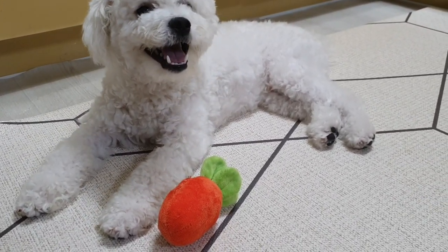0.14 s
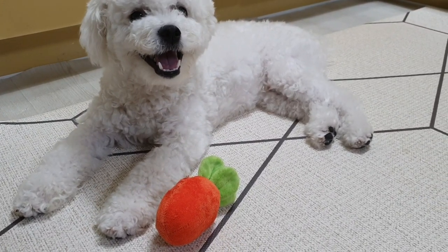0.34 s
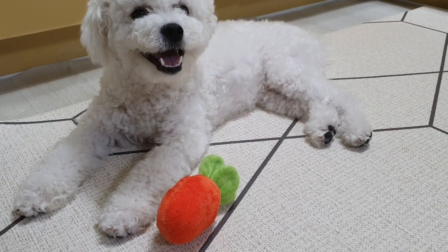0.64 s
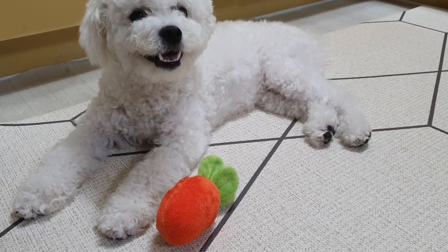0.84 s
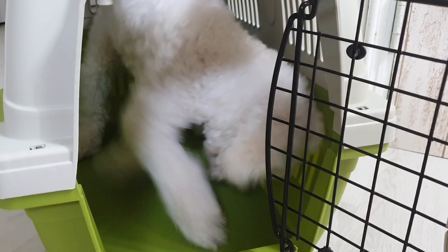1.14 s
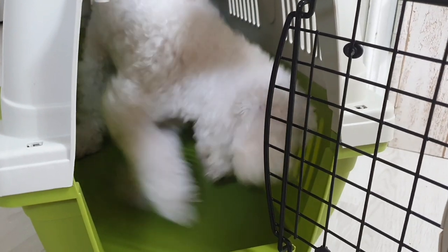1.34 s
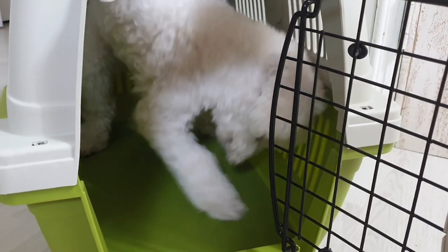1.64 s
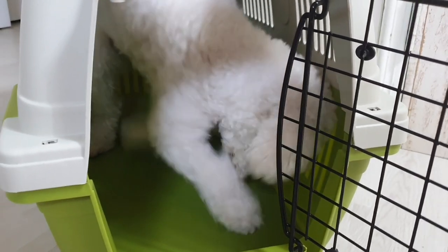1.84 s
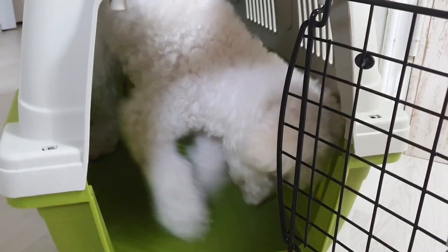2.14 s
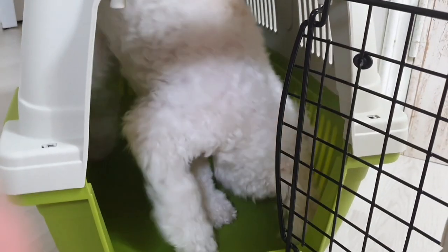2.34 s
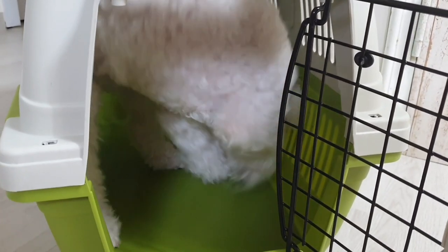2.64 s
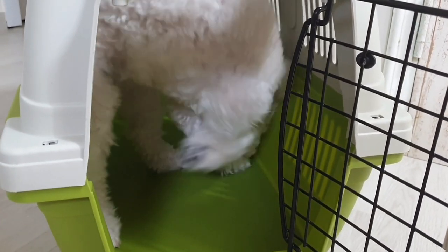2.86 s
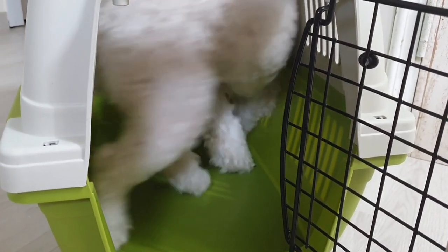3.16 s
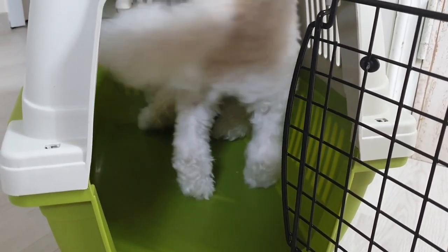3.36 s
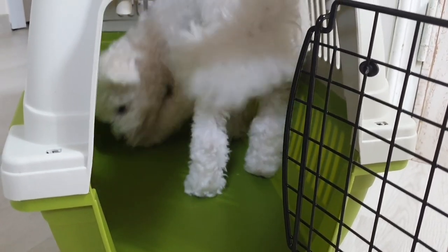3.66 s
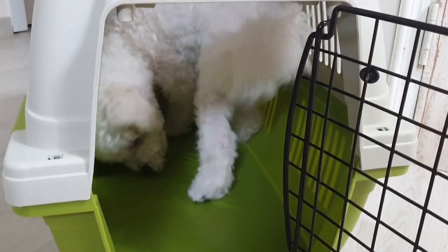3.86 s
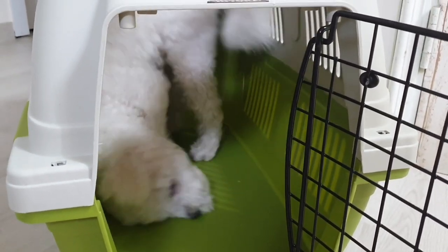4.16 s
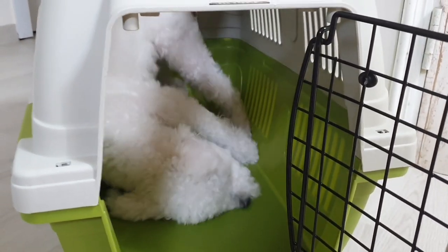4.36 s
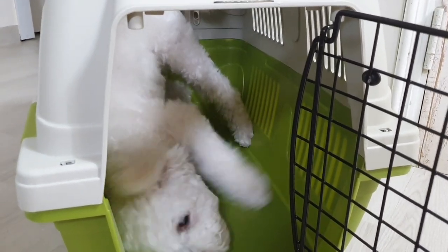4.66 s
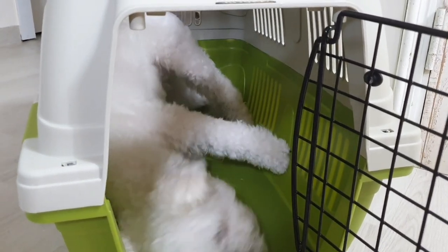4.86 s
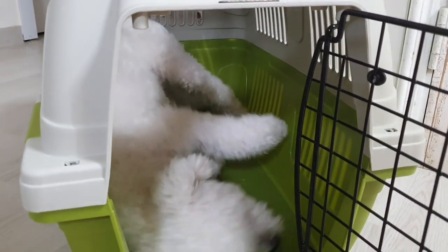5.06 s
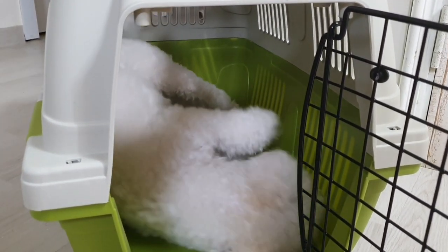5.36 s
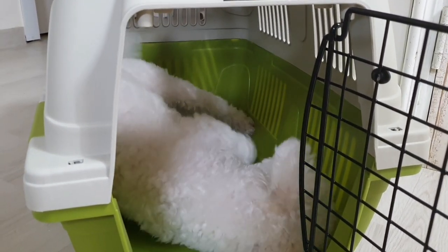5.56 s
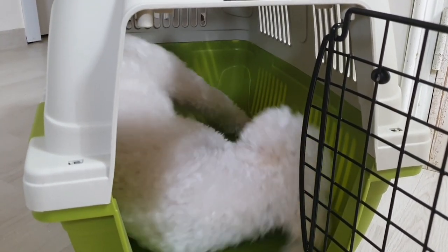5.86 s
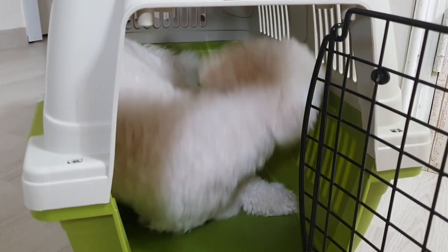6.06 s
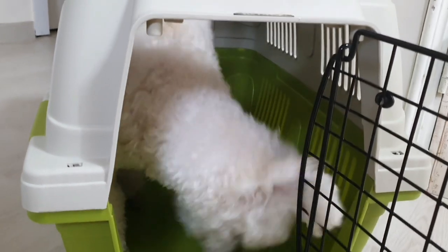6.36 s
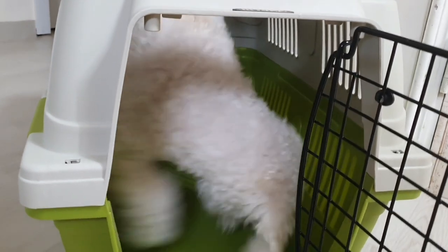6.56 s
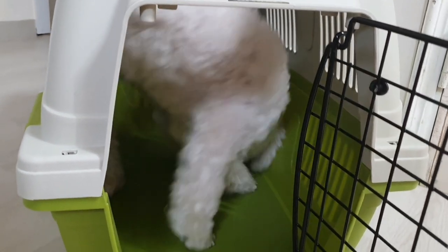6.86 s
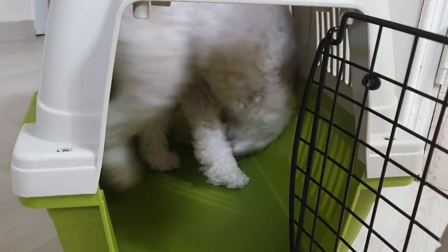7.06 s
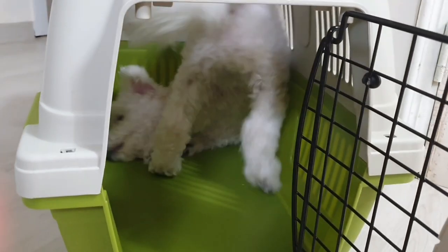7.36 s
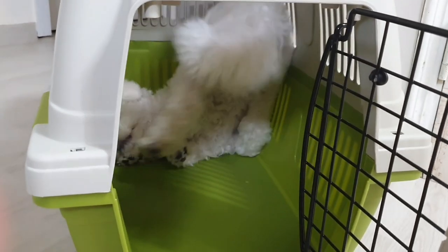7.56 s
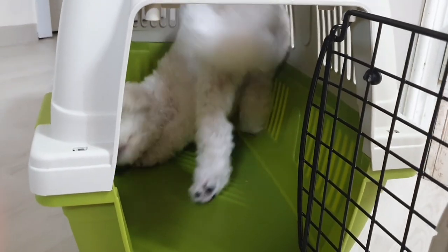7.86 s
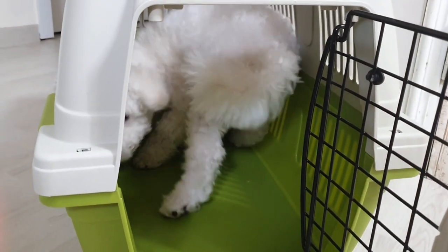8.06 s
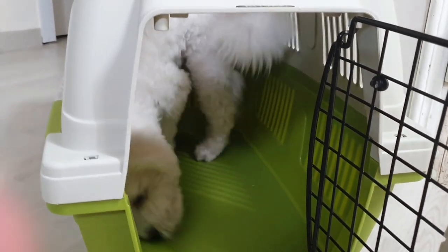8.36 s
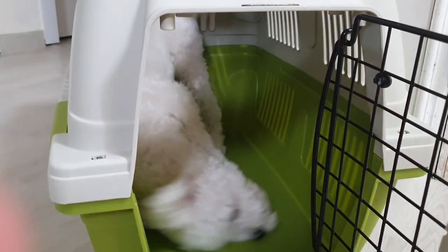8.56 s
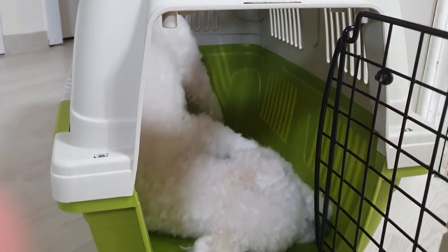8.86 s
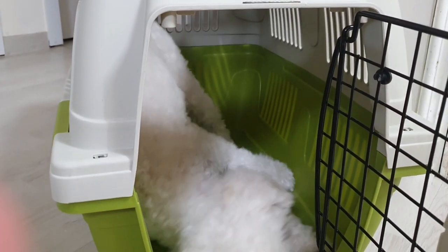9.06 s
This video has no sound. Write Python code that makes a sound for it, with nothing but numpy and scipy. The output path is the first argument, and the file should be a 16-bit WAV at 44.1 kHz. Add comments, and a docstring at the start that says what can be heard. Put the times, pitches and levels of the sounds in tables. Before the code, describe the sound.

For the first 0.9 seconds there is only faint, low room rumble, which fades quickly into a very short silence. At about 1.03 s the sound cuts in abruptly: a small dog digs in a plastic carrier, claws scraping and ticking on the hard floor pan while paws strike hollow, boxy low thumps at a steady nine or so per second until about 2.3 s. Strong, dry scratches continue to about 3 s, more irregular. From 3 to 4 s come sparser skids and soft rubs. Around 4.2-4.4 s a tumble gives a cluster of knocks, then quieter ticks and fur slides, with a near lull at 5.5-5.9 s. A rub at 6 s leads to heavier bumps and scratches near 6.7 s, then light clicks, scuffs and thuds to 9.2 s. Close stereo pickup, short room reverberation, quiet rumble beneath.

```python
"""A small dog digs, turns and rolls in a plastic carrier in a quiet room: claws tick and skid on the floor pan,
paws and body thump it, fur and pads rub along it. Ticks, blows and clumped friction slips set the shell's
modes ringing at three spots, which reach two microphone ports with a wall echo and a short room tail.
A moment of bare room rumble, shaped from noise, comes first and fades out; after a short silence the dog
and the rumble come in abruptly."""
import sys
import numpy as np
from scipy import signal
from scipy.fft import rfft, irfft, next_fast_len
from scipy.io import wavfile

SR = 44100
rng = np.random.default_rng(int(sys.argv[2]) if len(sys.argv) > 2 else 0)


def materialize(psi):
    """Save the field psi as 16-bit PCM at rate SR to the path in sys.argv[1].

    A 1-D psi becomes a single channel; in a 2-D psi each row is a channel.
    """
    bounded = np.clip(np.atleast_2d(psi).T, -1, 1)
    quanta = np.round(bounded * 32767).astype(np.int16)
    wavfile.write(sys.argv[1], SR, quanta)


N = 406161

# claw contacts on the pan, levels relative: [t/s, skid level/dB, treble modes/dB, low modes/dB,
# skid decay/ms, first tick against the skid/dB]
CLAW_CONTACTS = [(1.094, -31, -12, 7, 6.1, 0), (1.104, -17.5, -5, -12, 1.6, 12.5),
                 (1.1139, -16.5, -8, -14, 7.3, 0), (1.1448, -19, -8.5, -30, 5.2, 16),
                 (1.216, -18.5, -3, -10, 2.7, 10), (1.2298, -16, -7, -17, 5, 8),
                 (1.3342, -14, -1.5, -38, 3.6, 9.5), (1.3649, -18.5, -11, -19, 5.4, 7),
                 (1.4417, -15, -7, -35, 2.2, 4), (1.5657, -11.5, -6, -17, 3.4, 5),
                 (1.697, -12.5, -4, -27, 4.2, -18), (1.711, -17, -31, -16, 2.3, 7),
                 (1.7938, -6, -6.5, -15.5, 2.7, 9), (1.8984, -6, -10, -16.5, 1.1, 4),
                 (2.0275, -11, -5.5, -15, 2.5, -5), (2.137, -11.5, -6, -16, 8.5, 14.5),
                 (2.2649, -14, -4, -11, 1.26, 13.5), (2.3907, -11.5, -10.5, -17, 1.6, -1),
                 (2.4064, -26.5, -3, -14, 1.2, 22), (2.551, -8, -10, -27, 1.4, 17),
                 (2.6289, -17.5, -10.5, -16, 6.9, 9), (2.6508, -24, -6, -8, 4.5, 15),
                 (2.7637, -11.5, -6.5, -23, 3.1, 9), (2.8788, -4, -13.5, -46, 2.4, -4),
                 (2.8905, -18.5, -1.5, -5, 2.5, 15.5), (3.025, -22, -9.5, -13, 3.8, -3),
                 (3.242, -12, -8, -12.5, 1.2, -1), (3.407, -16.5, -12, -17, 2.5, -8),
                 (3.483, -25.5, -5, -27, 4.1, 6), (3.501, -20.5, -16, -18, 5.5, -4),
                 (3.728, -16, -11.5, -38, 2.2, 16.5), (3.741, -29.5, 2.5, -14, 2.2, 1),
                 (3.8717, -27.5, -19, -30, 2.3, 2), (3.926, -46, -6, 9.5, 2.2, 12),
                 (3.9876, -33, -11, -3, 11, -4), (4.007, -15.5, -13.5, -16.5, 1.9, 17),
                 (4.171, -51.5, -18, 20.5, 16, 0), (4.2233, -28.5, -32, -3, 4.2, 5),
                 (4.2567, -42, -31, 17, 3.5, -5), (4.31, -38, -6, -15, 2.1, 8),
                 (4.3304, -26.5, -7, 0, 5.3, -3), (4.34, -21, -14, -4.5, 3.4, -8),
                 (4.372, -24, -12, -23, 8, 3), (4.435, -24, -2, -22, 3.9, -2),
                 (4.4416, -15, -9.5, -12, 2.2, 6), (4.623, -31.5, -6, -14, 4.4, 7),
                 (4.734, -32, -7, -9.5, 5, 22), (4.786, -19, -1, -25, 2, 9),
                 (4.7933, -20.5, -2.5, -9, 1.4, 15.5), (4.9708, -41.5, 1, 8.5, 3.8, 12),
                 (5.1181, -20, -1, -5.5, 5.1, 10), (5.2592, -16, -7, -14, 2.5, -3),
                 (5.271, -21.5, -4, -14, 1.5, 7), (5.5384, -46.5, -5, -18, 8.6, 14),
                 (5.557, -46, -6, -20, 1.8, 10), (5.5774, -56, -7, -15, 2.2, 19),
                 (5.872, -33, -16, -12, 1.7, 9), (6.19, -36.5, -30, -4, 11, 11),
                 (6.2449, -34.5, -8, -22, 2.6, 15), (6.3358, -32.5, -22, 4.5, 13.4, 3),
                 (6.3616, -19, -6, -14.5, 6.8, 7), (6.504, -29.5, -5, -25, 5.8, 20),
                 (6.5165, -33, -8.5, -37, 5.5, 24), (6.603, -33, -1.5, 2.5, 4.9, 5),
                 (6.6536, -11.5, -9, -9, 2.7, 1), (6.6987, -12, -7, -10, 1.8, 10.5),
                 (6.8052, -26.5, -31, -4, 6, 0), (6.914, -22.5, -2, -9.5, 5.4, 4),
                 (7.005, -44, -5.5, -4.5, .8, 30), (7.175, -54, -14, -18, .8, 26),
                 (7.198, -54, -10, -10, .8, 27), (7.207, -48, -16, -8, .8, 30),
                 (7.2535, -45, -8, -3, .8, 31.5), (7.276, -45, -3, -7, 1.2, 24),
                 (7.2808, -14.5, -6.5, -19, 2.6, 12), (7.3051, -24.5, -9.5, -2.5, 3.9, 21.5),
                 (7.4216, -19.5, -8.5, -5, 1.1, 13.5), (7.5429, -29, -14, -37, 2.8, 6),
                 (7.6306, -54.5, -54, 18, 7.1, 12), (7.658, -35.5, -16, -50, 7, 11),
                 (7.787, -31.5, -18, 0, 3.2, 7), (7.7923, -24, -4.5, -2, 2.5, -1),
                 (7.9054, -35, -21, 4, 5.4, 5), (7.933, -34, -10, -17, 2, 16),
                 (7.9804, -28.5, -15, -6, 13, 4), (8.035, -30, -10, -34, 5.2, 11),
                 (8.228, -43.5, -11, -20, 2.8, 12), (8.2881, -39, -7, 1, 1.2, 15),
                 (8.33, -14.5, -10, -23, 1.3, 3), (8.489, -30.5, -9, -35, 3.1, 16.5),
                 (8.5936, -38, -28, 3, 13, 11), (8.6232, -34, -17, -9, 31, 16),
                 (8.667, -15.5, -20, -22, 10.5, -4), (8.7141, -25, -14, -6, 2.3, 2),
                 (8.814, -27, -14.5, -4.5, 3.8, -2), (8.8706, -27, -10, -34, 7.4, 1),
                 (8.8898, -23, -27, -14, 3.7, 10), (8.9417, -22, -17, -42, 21, 14),
                 (8.975, -29, -21, -20, 5.2, 0), (9.0201, -37, -13, -24, 1.2, 26),
                 (9.081, -15, -15, -17, 5, -12), (9.1259, -17, -16, -62, 3.3, 12),
                 (9.1494, -21.5, -18, -17, 2.6, -5)]
# forepaw blows of the digging, at a nearly steady beat: [t/s, relative peak level/dB]
DIG_BLOWS = [(1.119, -12.5), (1.236, -7.5), (1.346, -10), (1.457, -9), (1.574, -13), (1.687, -9),
             (1.816, -6), (1.921, -6), (2.038, -8), (2.157, -7), (2.259, -19)]
# ringing modes of the plastic shell: [f/Hz, relative level/dB, t60/s]
SHELL_MODES = [(84, 6, 0.066), (125.8, -1, 0.12), (167.6, -0.5, 0.05), (242.5, 2.5, 0.28), (303, 7, 0.03),
               (380, 1, 0.092), (477, -5.5, 0.029), (688, -10, 0.057), (838, -4.5, 0.051),
               (1053, 3.5, 0.0048), (1445, 20.5, 0.0031), (1660, 4.5, 0.0057), (2204, 4.5, 0.003),
               (2693, 7, 0.0021), (2993, 4, 0.0037), (3344, 6.5, 0.0024), (3776, 0.5, 0.0034),
               (4450, 10.5, 0.0015), (5240, 0, 0.0019), (5940, -1.5, 0.0026), (7030, 0, 0.0016),
               (9960, -7.5, 0.0013), (11230, 0, 0.0011), (13800, -39, .003)]
# families of shell modes, dull to fine; each radiates little above its own range: [lowest f/Hz, highest f/Hz]
MODE_FAMILIES = [(500, 1500), (1500, 3700), (3700, 8000), (8000, 15400)]
# spots on the pan, each with its own path to the ports: [extra lag of the left port/ms]
SPOT_LAGS_MS = [0, 0.086, -0.065]

FADE_FROM_S, SILENT_FROM_S, CUT_IN_S = .86, .93, 1.027


def from_db(db):
    """Decibels to gain."""
    return 10 ** (np.asarray(db) / 20)


def rms_one(x):
    """Scale to rms 1."""
    return x / np.sqrt(np.mean(x ** 2) + 1e-20)


def in_time(rows):
    """Columns of a curve table, sample by sample."""
    s, *columns = np.transpose(rows)
    return [np.interp(np.arange(N) / SR, s, c) for c in columns]


def at_hz(points, hz):
    """Read a table on a log-frequency axis."""
    table_hz, values = np.array(points).T
    return np.interp(np.log(hz), np.log(table_hz), values)


def ring(force, hz, t60):
    """One damped mode: a unit click sets off a ring of height about 1, weak far below and above its pitch."""
    decay = from_db(-60 / (max(t60, .001) * SR))   # per sample
    turn = 2 * np.pi * hz / SR   # radians per sample
    poles = [1, -2 * decay * np.cos(turn), decay * decay]
    return signal.lfilter([.5, 0, -.5], poles, force + 1e-18)


def diffuse(length, band_gain):
    """Stereo noise in third-octave bands; band_gain(hz) shapes each, mid and side set the stereo width."""
    # diffuse sound at the two ports: [f/Hz, left-right correlation]
    port_likeness = [(60, 0.93), (130, 0.99), (290, 0.88), (640, 0.28), (1410, -0.39), (3100, -0.057),
                     (6820, -0.11), (15000, -0.082)]
    out, edges = 0, 22 * 2 ** np.arange(0, 9.7, 1 / 3)
    white = rng.standard_normal((2, 2, length))
    for k, (low, high) in enumerate(zip(edges, edges[1:])):
        band = signal.butter(2, [low, high], "band", fs=SR, output="sos")
        mid, side = signal.sosfilt(band, white[k % 2])   # neighbouring bands use separate noise
        hz = np.sqrt(low * high)
        alike = np.clip(at_hz(port_likeness, hz), -1, 1)
        stereo = np.sqrt(1 + alike) * mid + np.sqrt(1 - alike) * side * [[1], [-1]]
        out = out + band_gain(hz) * stereo
    return out


def grit(shape, per_s, spread_db):
    """Uneven slips of something dragged over textured plastic: random clicks of either sign; rms 1."""
    sizes_db = spread_db * np.minimum(rng.exponential(1, shape), 4)
    sizes = from_db(sizes_db) * np.sign(rng.random(shape) - .5)
    return rms_one(sizes * (rng.random(shape) < per_s / SR))


def on_spots(s, force):
    """Lay one row of force per event on the pan, taking the spots in turn."""
    spots = len(SPOT_LAGS_MS)
    at = np.minimum((s * SR).astype(int)[:, None] + np.arange(force.shape[1]), N - 1)
    at = at + N * (np.arange(len(s)) % spots)[:, None]
    return np.bincount(at.ravel(), force.ravel(), spots * N).reshape(spots, N)


def rumble():
    """The room's low noise: a fixed spectrum whose level drifts slightly."""
    # noise spectrum: [f/Hz, relative level per Hz/dB]
    spectrum_db = [(22, -22), (45, -18.5), (90, 4.5), (135, -14.5), (230, -7.5), (310, -15.5), (400, -13.5),
                   (600, -26), (830, -21.5), (1300, -27.5), (2500, -36.5), (5000, -51.5), (7500, -55.5),
                   (10000, -58), (15500, -50)]
    # level ahead of the microphone: [t/s, level/dB]
    level_curve = [(0, -40.5), (.8, -41), (1.03, -39), (5, -40.5), (9.21, -39)]
    noise = rms_one(diffuse(N, lambda hz: from_db(at_hz(spectrum_db, hz))))
    return from_db(in_time(level_curve)[0]) * noise


def friction_db():
    """Level, fine and dull part of all rubbing: powers of claw drags, digging pulls, slides and coat add up."""
    # fur and pads sliding along the pan, levels relative:
    # [middle t/s, length/s, level/dB, fine hiss above 8 kHz/dB, dull part under 1.5 kHz/dB]
    slides = [(1.09, 0.26, -35.5, -55, -42), (2.39, 0.36, -53.5, -77.5, -52), (2.842, 0.2, -35, -56, -36.5),
              (3.037, 0.048, -55, -61, -62), (3.487, 0.21, -46, -73, -43), (3.6, 0.047, -48, -66, -53),
              (3.81, 0.32, -47, -80, -43), (4.087, 0.079, -44, -75, -36.5), (4.293, 0.23, -40.5, -64, -38),
              (4.548, 0.23, -49, -66, -54), (4.938, 0.15, -39.5, -62, -37.5), (5.077, 0.23, -44, -64, -55),
              (5.407, 0.087, -50.5, -72, -51), (5.998, 0.11, -30.5, -54.5, -31.5),
              (6.21, 0.081, -48, -71, -46), (6.416, 0.18, -43, -65.5, -58), (6.623, 0.074, -39.5, -62, -41),
              (6.807, 0.086, -36.5, -61, -55), (7.076, .15, -35.5, -54.5, -40),
              (7.437, 0.17, -36.5, -55.5, -39.5), (7.773, 0.084, -46, -64, -50),
              (7.95, 0.21, -42, -63.5, -42.5), (8.085, 0.05, -43.5, -81, -40.5), (8.39, .1, -54, -64, -40),
              (8.52, 0.15, -49.5, -70, -51), (8.597, 0.065, -43.5, -70, -57),
              (8.76, 0.32, -46.5, -64, -43.5), (8.878, 0.035, -45, -57, -47), (8.94, 0.096, -60, -76, -35),
              (9.08, 0.079, -35, -48.5, -40)]
    t = np.arange(0, N / SR, 1 / 500)

    # a pad drags on after every claw contact
    s, skid_db, treble_db, low_db = np.transpose(CLAW_CONTACTS)[:4]
    rise_s, fall_s = 0.017, 0.062
    age = np.maximum(t[:, None] - s, 0)
    drag = (1 - np.exp(-age / rise_s)) * np.exp(-age / fall_s)
    drag_db = np.transpose([skid_db - 30, skid_db + treble_db - 43, skid_db + low_db - 10])

    # a digging paw is pulled back along the pan: same columns as the slides
    pull_s = 0.077
    pulls = [(s + pull_s / 2, pull_s, -32, -54, -34.5) for s, _ in DIG_BLOWS]
    middle, length, *slide_db = np.transpose(pulls + slides)
    # length = time above half height
    swell = np.cos(np.pi * np.clip((t[:, None] - middle) / (2 * length), -.5, .5)) ** 2

    coat_db = np.array([-60, -85, -56])   # faint rustle that never quite stops: level, fine, dull
    power = drag ** 2 @ from_db(2 * drag_db) + swell ** 2 @ from_db(2 * np.transpose(slide_db))
    power = power + from_db(2 * coat_db)
    return in_time(np.column_stack([t, 10 * np.log10(power)]))


def rubbing():
    """Dense slips all over the pan, coming in clumps as hair and pads stick and let go; force per family."""
    level_db, fine_db, dull_db = friction_db()
    spots, clump = len(SPOT_LAGS_MS), 300   # clump length in samples
    steps_db = 3.5 * rng.standard_normal((spots, N // clump + 1))
    clumps_db = np.repeat(steps_db, clump, axis=1)[:, :N]
    slips = rms_one(grit((spots, N), per_s=2500, spread_db=3.0) * from_db(clumps_db))
    # sparser: a claw tip catches while the paw slides
    slips = slips + from_db(-10.5) * grit((spots, N), per_s=54, spread_db=3.5)
    family_db = [dull_db - 35.5, level_db - 30.0, (level_db + fine_db) / 2 - 19.0, fine_db + 2]
    return [from_db(db) * slips for db in family_db]


def claws():
    """A tick, then a skid of slips that swells and dies. Returns times, forces and dB for each mode family."""
    s, skid_db, treble_db, low_db, skid_ms, tick_db = np.transpose(CLAW_CONTACTS)
    age = np.arange(SR // 15) / (np.maximum(skid_ms, .5)[:, None] * SR / 1000)   # in decay times
    force = grit(age.shape, per_s=5000, spread_db=3.0) * age ** 0.71 * np.exp(-age)
    # every skid gets the same energy, so that the table sets its level
    force = 7.2 * force / np.sqrt(np.sum(force ** 2, axis=1, keepdims=True) + 1e-9)
    force[:, 0] = from_db(tick_db)
    family_db = [skid_db + low_db - 20.5, skid_db - 22, skid_db + treble_db - 14, skid_db + treble_db - 4.5]
    return s, force, family_db


def scratching():
    """Claws and rubbing set the upper modes ringing; every claw contact strikes them unevenly."""
    s, force, claw_db = claws()
    uneven_db = rng.normal(0, 1.94, (len(s), len(SHELL_MODES)))
    out = 0
    for (low, high), touch_db, rub in zip(MODE_FAMILIES, claw_db, rubbing()):
        family = 0
        for k, (hz, mode_db, t60) in enumerate(SHELL_MODES):
            if low < hz < high:
                touch = from_db(touch_db + uneven_db[:, k])[:, None] * force
                family = family + from_db(mode_db) * ring(rub + on_spots(s, touch), hz, t60)
        out = out + signal.sosfilt(signal.butter(2, high, fs=SR, output="sos"), family)
    return out


def blows():
    """Digging blows, the jolts of the pan after each, then all other thumps: time, level, colour."""
    # the pan jolts again after each digging blow: [delay t/s, level against the blow/dB, colour f/Hz]
    dig_jolts = [(.037, -12.5, 152), (.076, -12, 131)]
    # other landings of paws and body: [t/s, relative peak level/dB, centre of the blow's colour f/Hz]
    landings = [(1.136, -14, 126), (2.301, -22, 135), (2.378, -19.5, 149), (2.553, -16.5, 365),
                (2.78, -30, 132), (2.846, -23.5, 143), (3.257, -24, 238), (3.748, -27, 99),
                (3.93, -24.5, 450), (4.026, -24, 190), (4.11, -25, 195), (4.197, -15, 314),
                (4.212, -31, 290), (4.258, -15.5, 302), (4.273, -16.5, 380), (4.292, -30, 430),
                (4.236, -30, 524), (4.312, -23, 560), (4.335, -21, 239), (4.337, -10.5, 820),
                (4.371, -30, 219), (4.69, -32, 423), (5.398, -31.5, 400), (6.007, -22, 193),
                (6.044, -25.5, 113), (6.536, -24, 99), (6.659, -13.5, 224), (6.722, -12.5, 96),
                (6.794, -29, 112), (7.108, -21.5, 117), (7.294, -22.5, 211), (7.369, -17, 160),
                (7.425, -24, 224), (7.509, -20, 102), (7.788, -25, 1070), (7.89, -25, 190),
                (7.937, -25, 100), (7.994, -18, 470), (8.014, -25, 148), (8.422, -23.5, 181),
                (8.604, -25, 174), (8.639, -24, 113), (9.091, -27, 200)]
    digs = [(s, db, 130.8) for s, db in DIG_BLOWS]   # colour in Hz
    jolts = [(s + later, db + loss_db, hz) for s, db in DIG_BLOWS for later, loss_db, hz in dig_jolts]
    return digs + jolts + landings


def thumps():
    """Soft blows: each drives the modes nearest its own colour; the deeper the blow, the longer the contact."""
    s, peak_db, centre_hz = np.transpose(blows())
    part = np.arange(SR // 100) / SR * centre_hz[:, None] / 0.34   # the contact lasts this share of a cycle
    push = np.sin(np.pi * np.minimum(part, 1)) ** 2
    push = push / push.sum(axis=1, keepdims=True)

    # the light pan lifts and knocks back on the floor
    rebound_s, rebound_db = 0.01416, -8.5
    wait = round(rebound_s * SR)
    rebound = np.pad(push, ((0, 0), (wait, 0)))
    push = np.pad(push, ((0, 0), (0, wait))) + from_db(rebound_db) * rebound

    out = 0
    for hz, mode_db, t60 in SHELL_MODES:
        if hz < MODE_FAMILIES[1][0]:
            off_colour_db = 20.0 * np.log2(hz / centre_hz) ** 2
            gain = from_db(peak_db + mode_db - 7.5 - off_colour_db)
            out = out + ring(on_spots(s, gain[:, None] * push), hz, t60)
    return out


def to_ports(x, lag_ms):
    """Direct sound, one wall echo and the room's tail, as the two microphone ports receive them."""
    # phase lead of the left port: [f/Hz, lead/rad]
    left_leads = [(130, 0.15), (250, 0.56), (500, 2.68), (800, 0), (1500, 3), (2000, 4), (2700, -0.7),
                  (4800, 4), (8000, 1.5)]
    # decay of the room's tail: [f/Hz, t60/s]
    room_t60 = [(100, 0.34), (300, 0.14), (800, 0.26), (2100, 0.37), (5500, 0.32), (12000, 0.3)]
    room_db, echo_s, echo_db = -2, .011, -16
    size, t = next_fast_len(N + SR // 2), np.arange(SR // 2) / SR
    hz = np.maximum(np.arange(size // 2 + 1) * SR / size, 1)

    lead = at_hz(left_leads, hz) - 2 * np.pi * hz * lag_ms / 1000
    direct = np.exp(.5j * lead * np.array([[1], [-1]]))
    # the echo reaches the right port slightly later
    echo = from_db(echo_db) * np.exp(-2j * np.pi * hz * echo_s * np.array([[1], [1.04]]))

    def band_decay(f):
        """Each band of the tail dies at its own rate."""
        t60 = at_hz(room_t60, f)
        return from_db(-60 * t / t60) / np.sqrt(t60)

    tail = diffuse(len(t), band_decay)
    tail = tail * np.minimum(t / 0.0015, 1) / np.sqrt(np.sum(tail ** 2) / 2)
    paths = direct + echo + from_db(room_db) * rfft(tail, size)
    return irfft(rfft(x, size) * paths, size)[:, :N]


def scene():
    """Rumble throughout, and the dog on the pan from the start of the silence on."""
    pan = (scratching() + thumps()) * (np.arange(N) / SR > SILENT_FROM_S)
    return sum(to_ports(x, lag_ms) for x, lag_ms in zip(pan, SPOT_LAGS_MS)) + rumble()


def record(dry):
    """Microphone colour per port, rounded peaks, fade to silence and abrupt return; the top is cut."""
    # microphone colour: [f/Hz, level/dB]
    mic_colour = [(30, 4.5), (50, 1.5), (6500, 0), (8500, -6), (11500, -11.5), (15000, -9.5), (16500, -32)]
    # balance of the ports: [f/Hz, left minus right level/dB]
    port_balance = [(100, 0), (250, -2.5), (500, -0.5), (1200, -0.5), (2400, -4), (4400, -7), (6000, -3.5),
                    (8500, 0.5), (15000, 3.5)]
    hz, t = np.maximum(np.arange(N // 2 + 1) * SR / N, 1), np.arange(N) / SR
    colour_db = at_hz(mic_colour, hz) + .5 * at_hz(port_balance, hz) * np.array([[1], [-1]])
    heard = np.tanh(irfft(rfft(dry) * from_db(colour_db), N))
    fade = np.clip((SILENT_FROM_S - t) / (SILENT_FROM_S - FADE_FROM_S), 0, 1)
    gate = fade + (t > CUT_IN_S)
    top_cut = signal.cheby2(12, 80, 16600, fs=SR, output="sos")   # order, dB down, Hz
    return signal.sosfilt(top_cut, heard * gate)


dry = scene()
out = record(dry)
materialize(out)
```